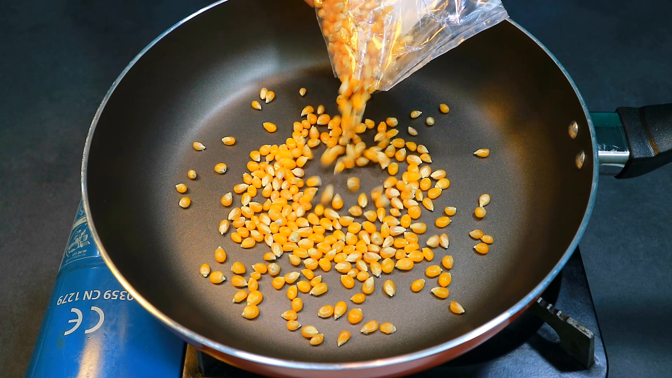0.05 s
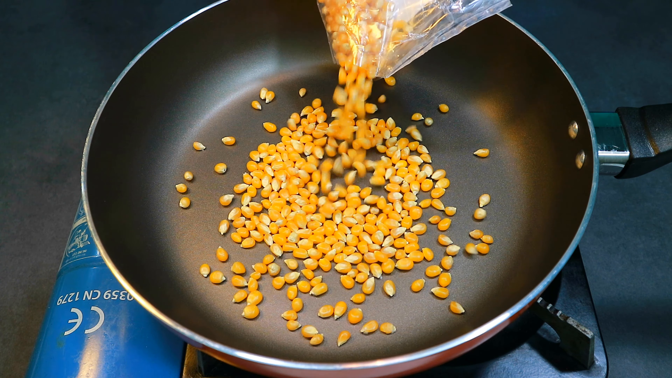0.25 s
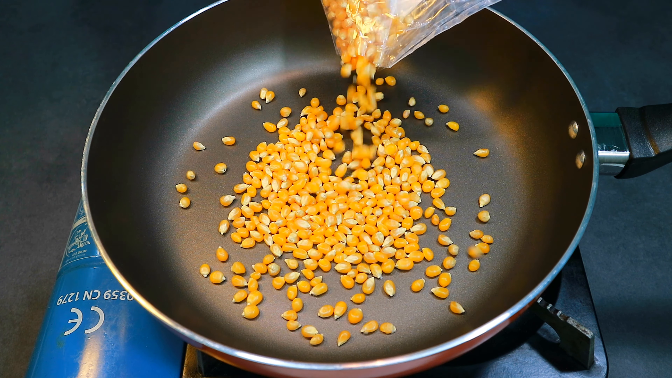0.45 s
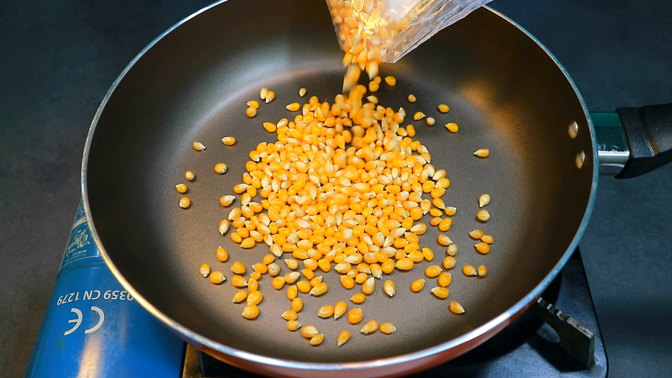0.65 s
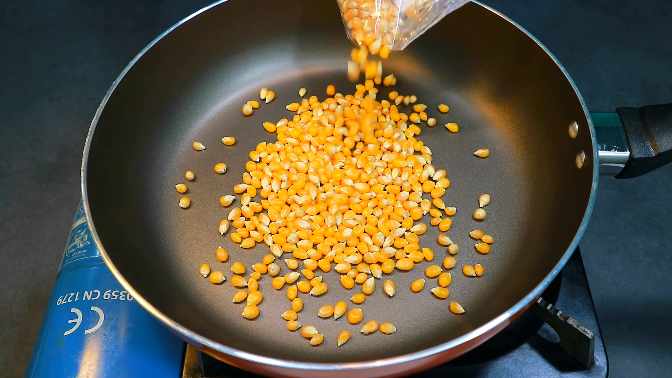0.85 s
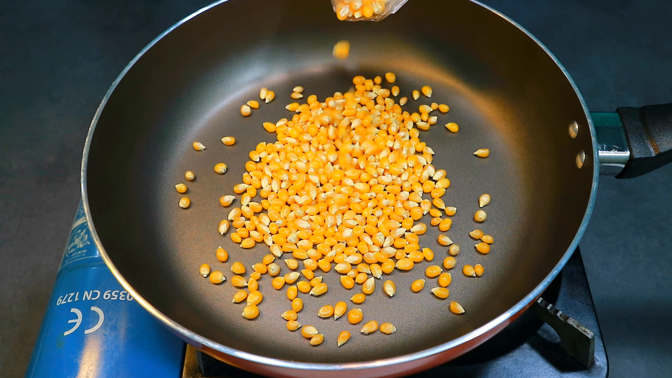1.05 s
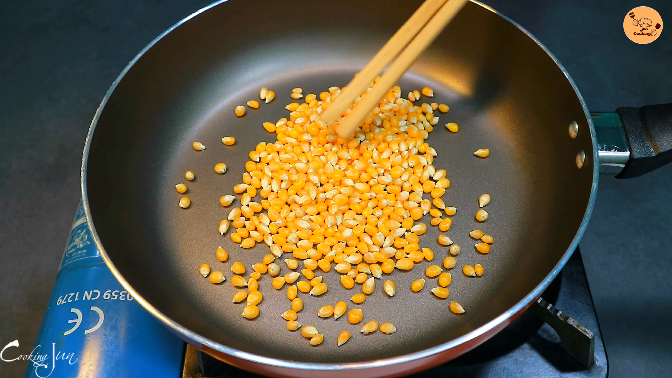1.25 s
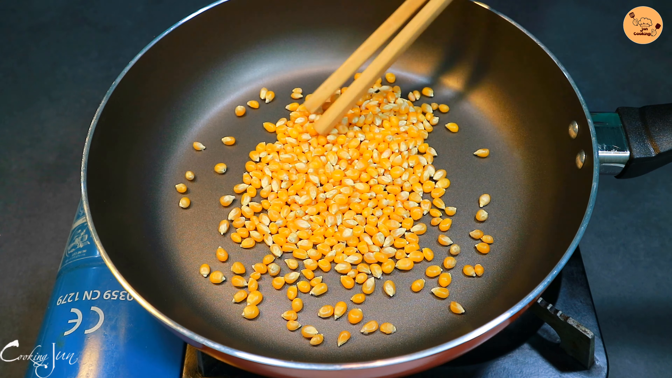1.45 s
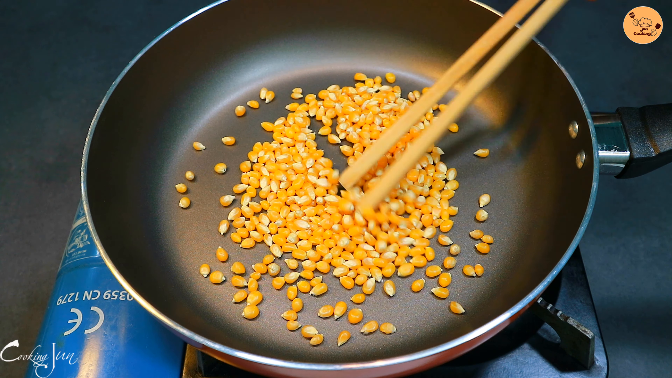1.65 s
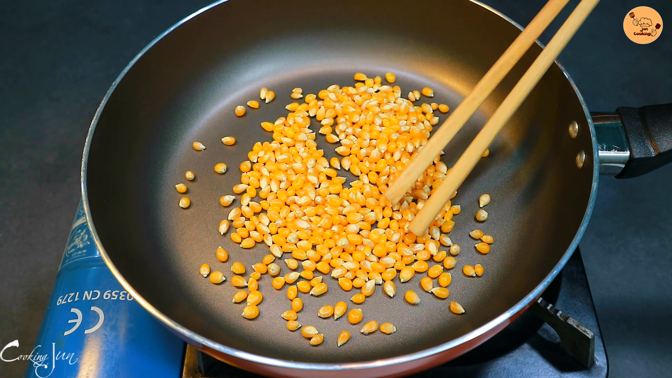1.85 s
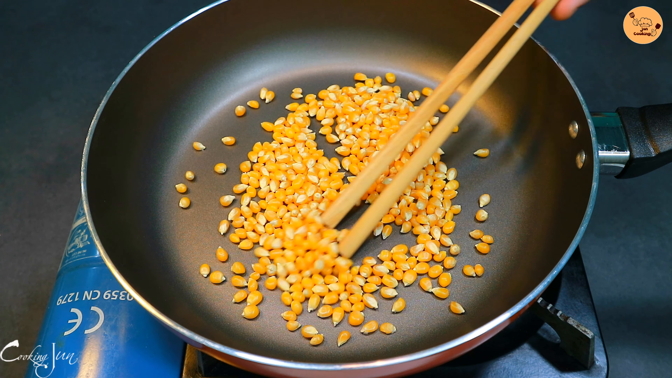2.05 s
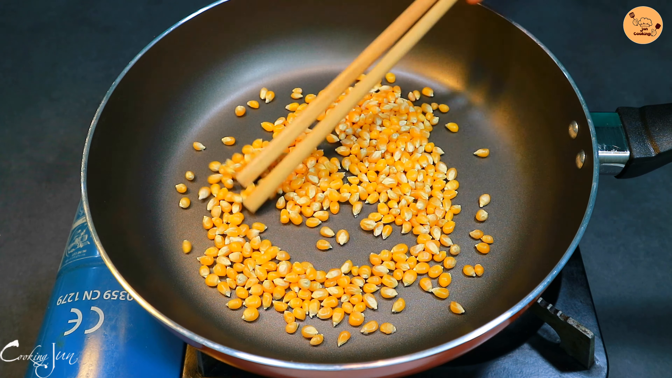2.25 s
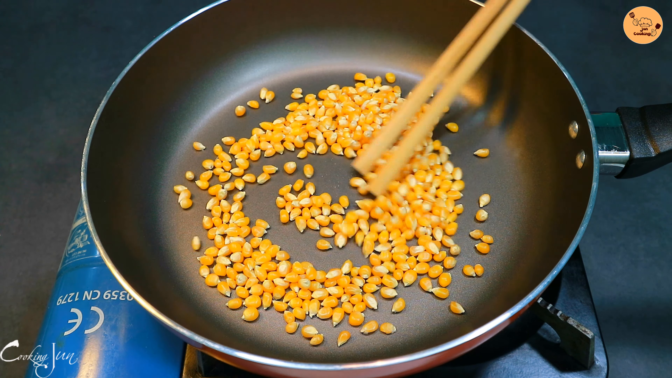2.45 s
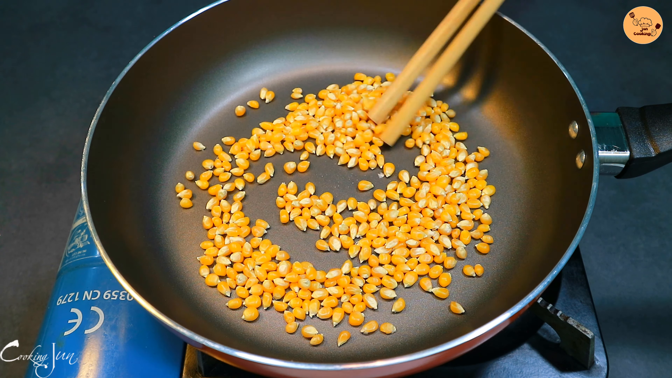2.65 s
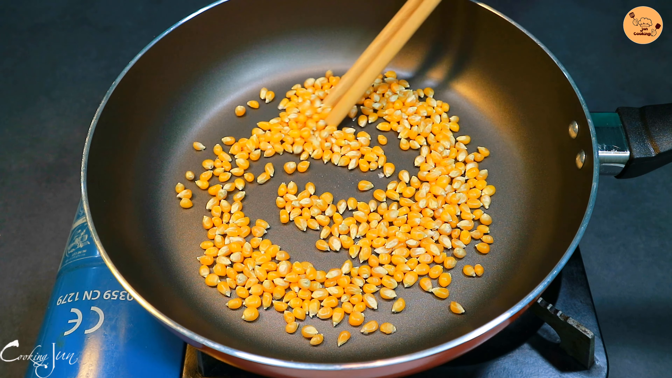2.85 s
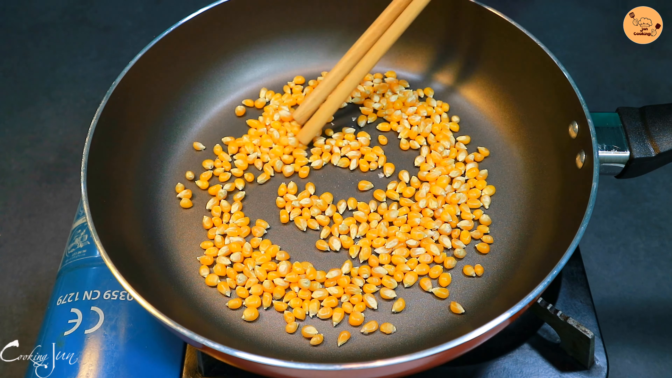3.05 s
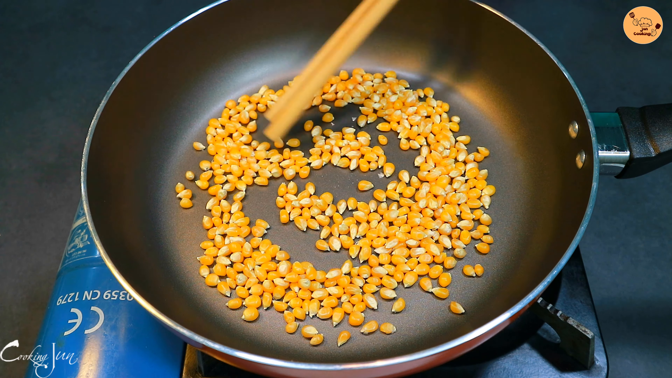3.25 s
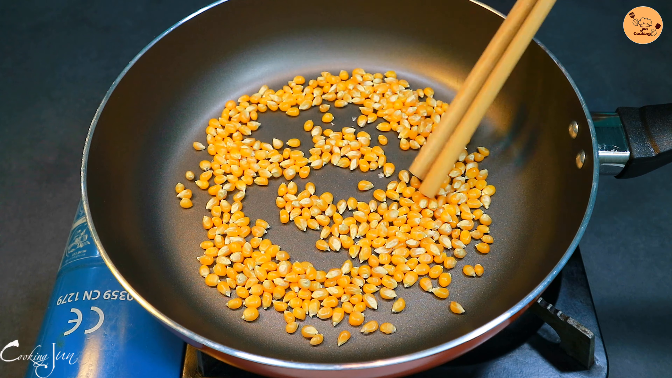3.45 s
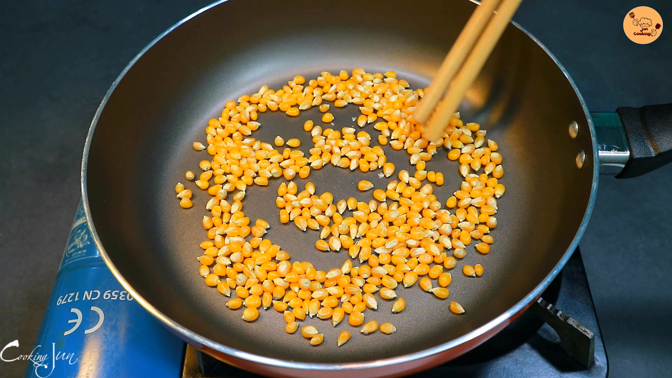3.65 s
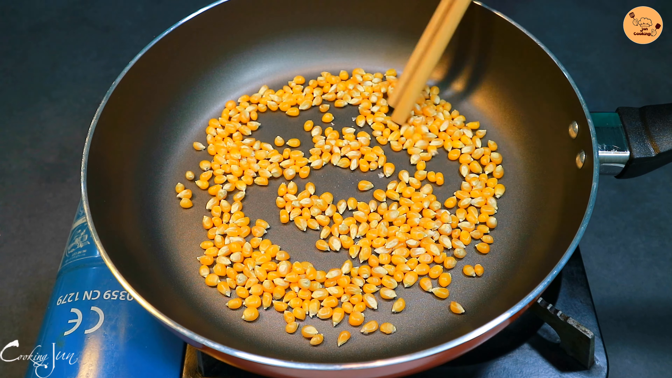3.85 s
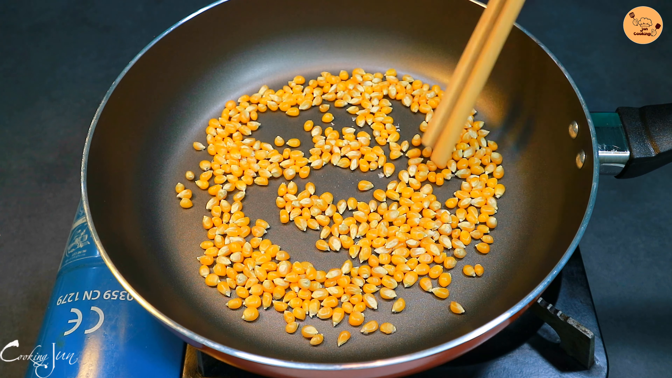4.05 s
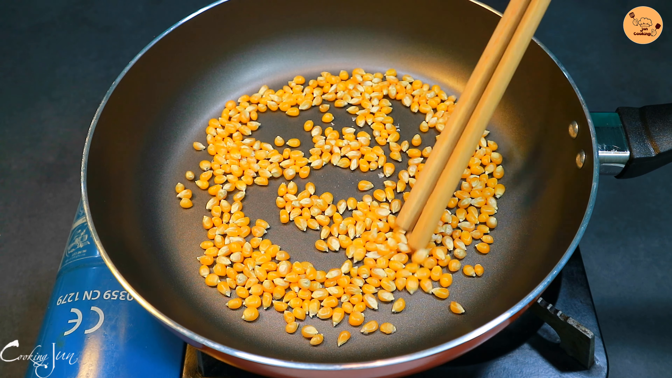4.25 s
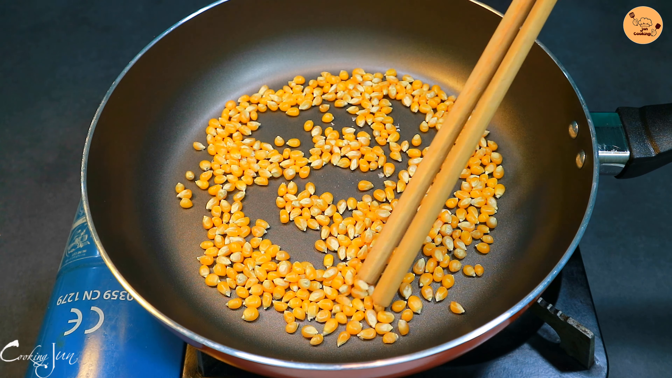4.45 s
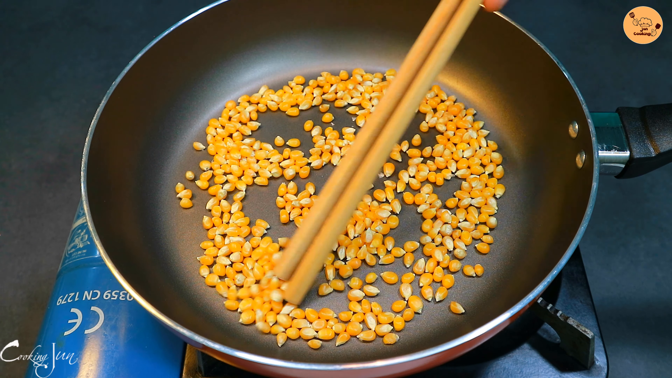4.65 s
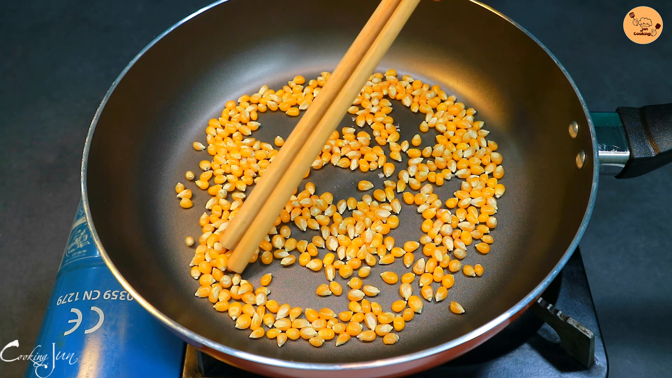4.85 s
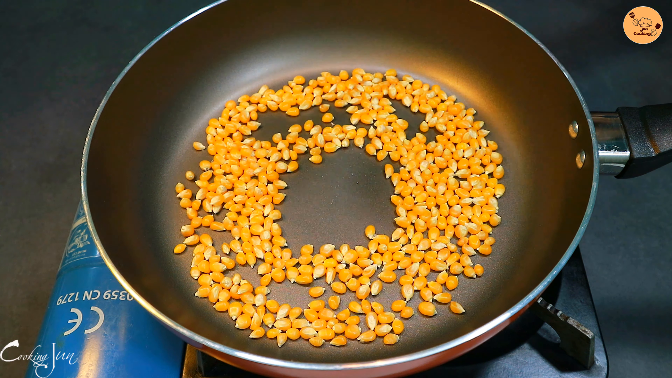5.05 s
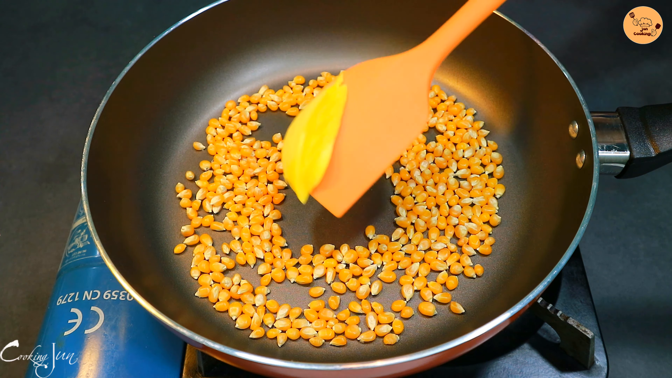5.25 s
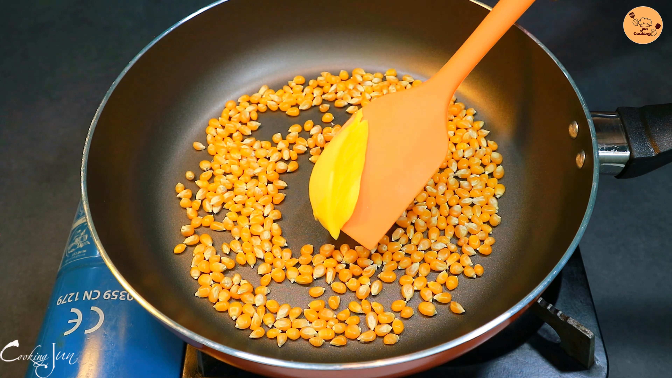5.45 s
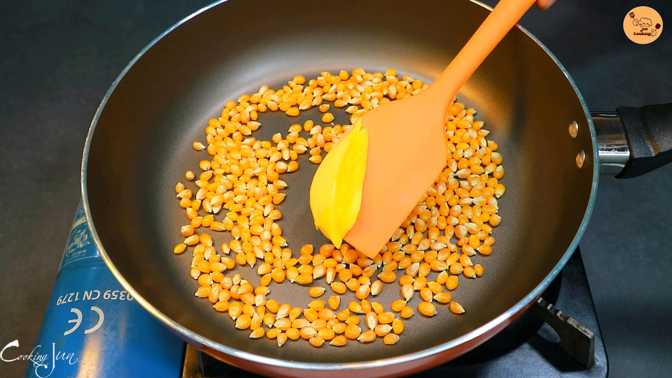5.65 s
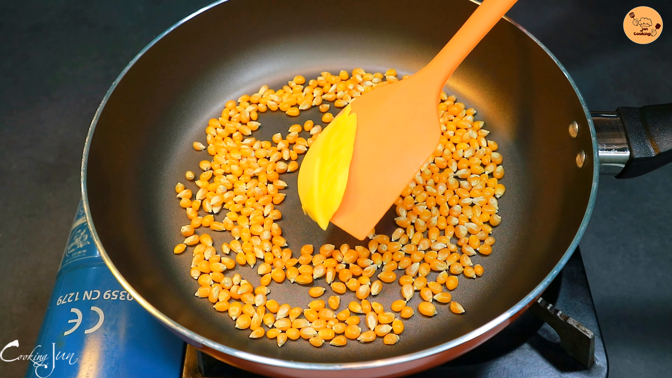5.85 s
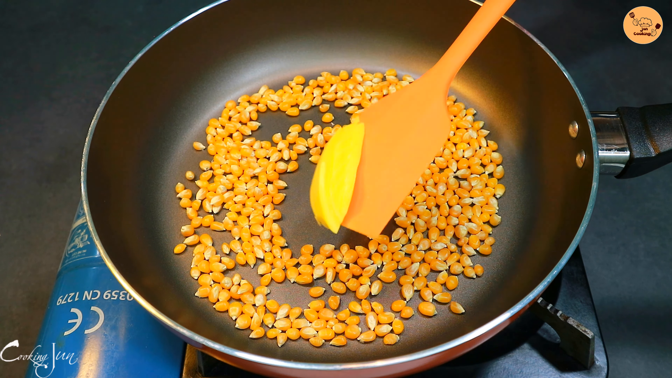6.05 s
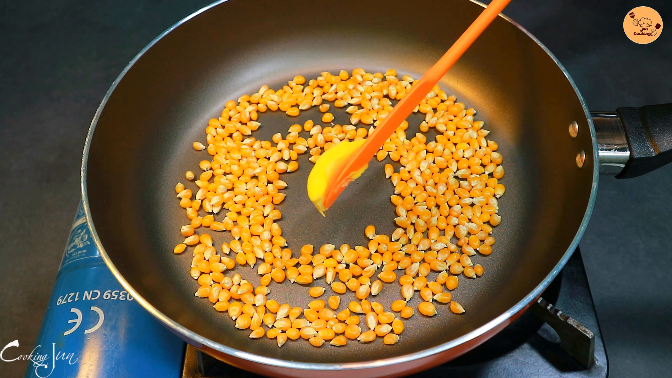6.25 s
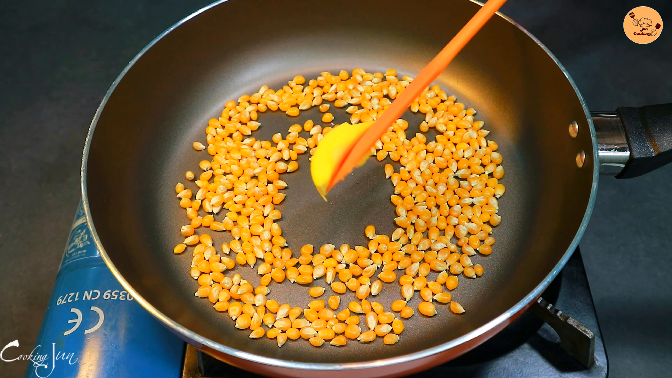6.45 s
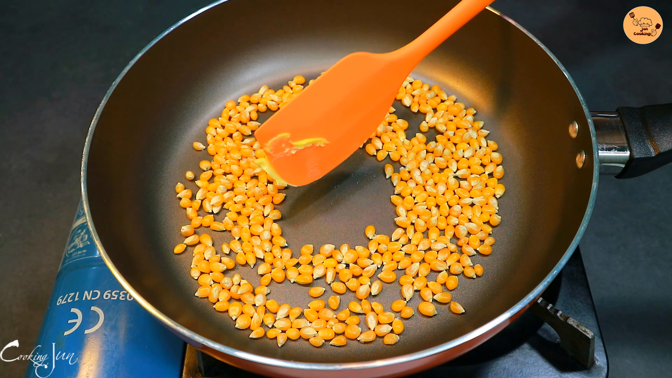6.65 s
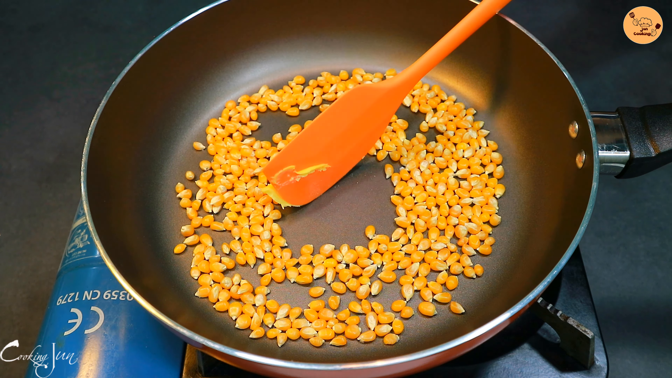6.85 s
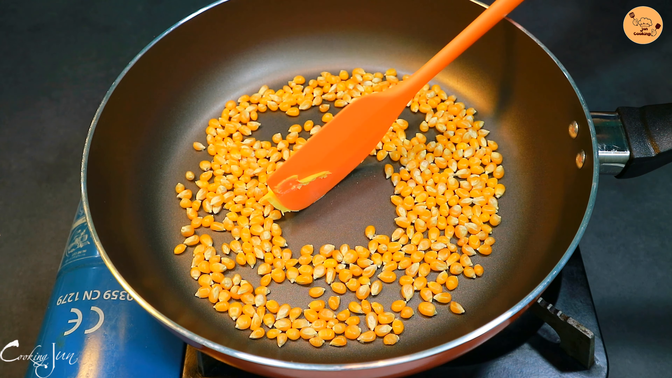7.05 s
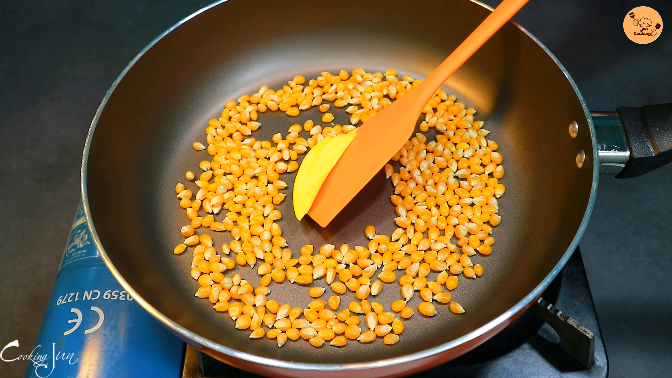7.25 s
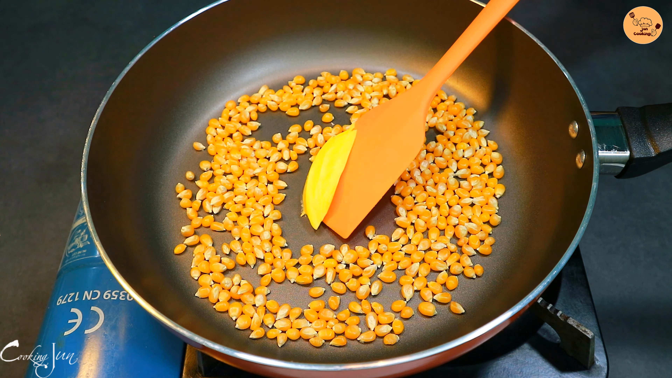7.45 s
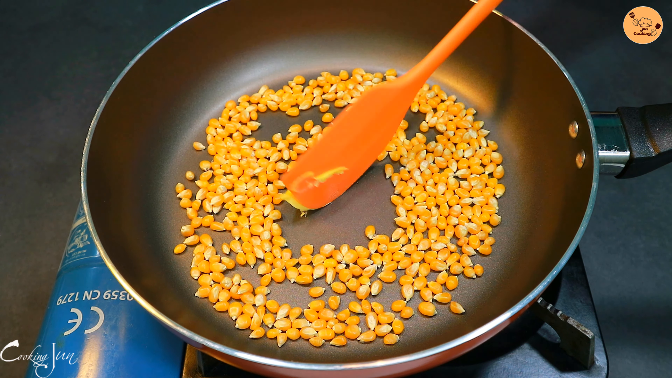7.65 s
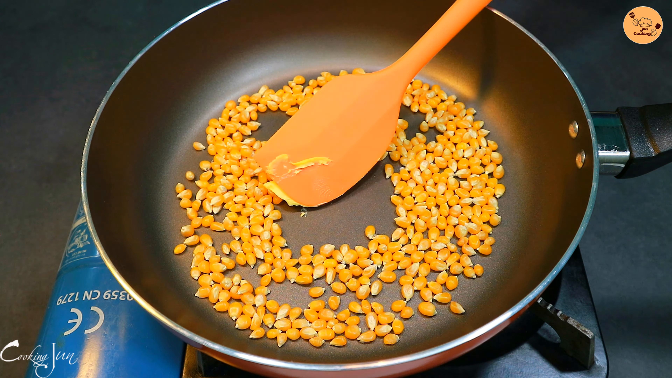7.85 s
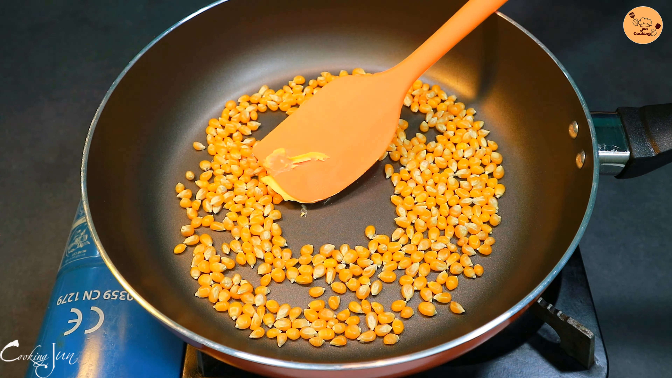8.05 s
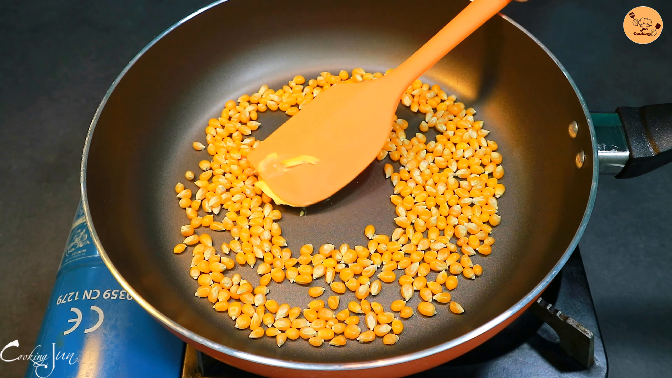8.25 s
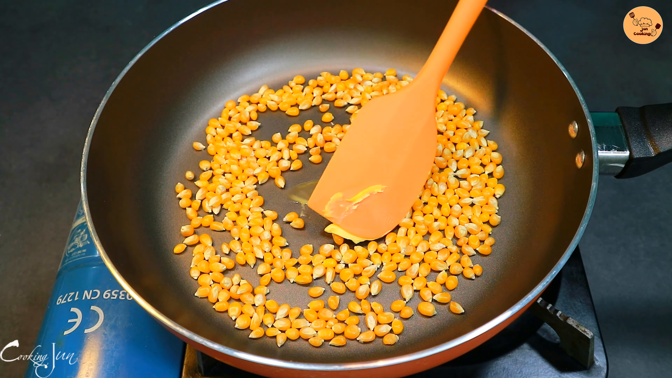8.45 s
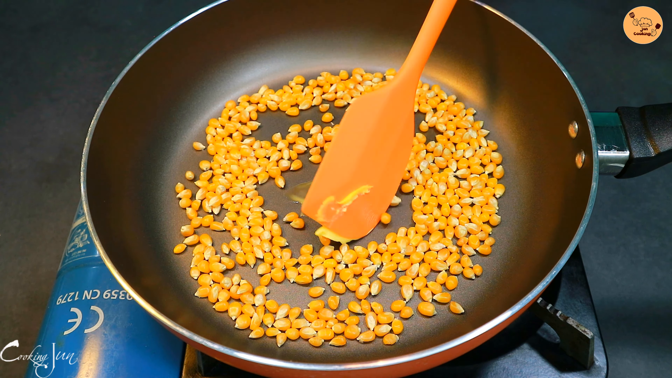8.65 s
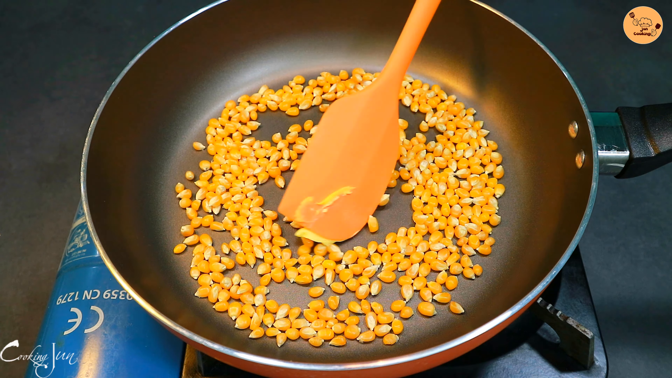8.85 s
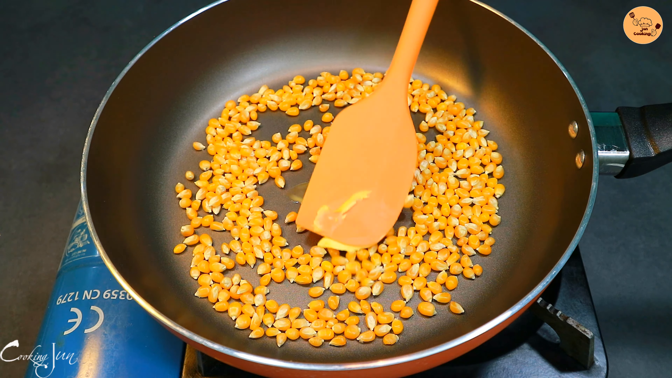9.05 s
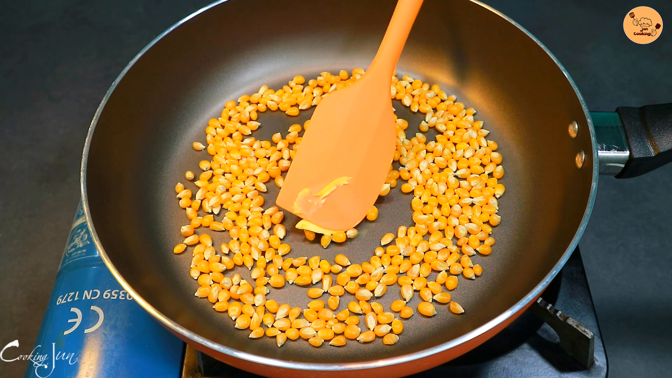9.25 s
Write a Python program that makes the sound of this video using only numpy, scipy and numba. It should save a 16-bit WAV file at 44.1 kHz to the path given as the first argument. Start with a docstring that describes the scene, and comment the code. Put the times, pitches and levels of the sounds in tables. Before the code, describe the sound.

Close by in a kitchen with a faint hum and hiss, hard corn kernels stream into a metal frying pan, each one ticking and ringing briefly. Chopsticks slide over the bottom and stir for several seconds, with wooden clacks and bursts of rattling. The rattle dies away, leaving scattered dull spatula taps that lightly shake the pan on its stand. Near the end the kernels click and roll again.

```python
"""Over a low hum and a wide hiss, dry corn kernels pour into a frying pan, each contact ringing its wall
and bottom. At 1.3 s chopstick tips slide over the bare bottom, then knock and stir the kernels until
about 5 s. From 5.6 s a spatula taps and bounces on the bottom; from 8.3 s it pushes the kernels about.
Every hit rings the same pan, and knocks and taps also shake it on its stand."""
import sys
import numpy as np
from scipy import signal
from scipy.fft import rfft, irfft
from scipy.io import wavfile
from scipy.ndimage import uniform_filter1d
from numba import njit

SR = 44100
rng = np.random.default_rng(int(sys.argv[2]) if len(sys.argv) > 2 else 0)


def write(x):
    x = np.atleast_2d(x).T
    wavfile.write(sys.argv[1], SR, np.round(np.clip(x, -1, 1) * 32767).astype(np.int16))


N = 410571


def undb(db):
    return 10 ** (np.asarray(db) / 20)


def unit_rms(x):
    return x / np.sqrt(np.mean(x ** 2))


def curves(rows):
    """Table columns at every sample."""
    time_s, *columns = np.transpose(rows)
    return [np.interp(np.arange(N) / SR, time_s, column) for column in columns]


def noise(spectrum, shape=N):
    """Unit-RMS noise shaped by (Hz, dB) points."""
    hz, db = np.transpose(spectrum)
    log_hz = np.log(np.arange(N // 2 + 1) * SR / N + 1)
    gain = undb(np.interp(log_hz, np.log(hz), db))
    return unit_rms(irfft(rfft(rng.standard_normal(shape)) * gain, N))


@njit
def damped_sines(start, end, pole, amplitude, rise, out):
    """One decaying sine per hit and mode, swelling during contact."""
    for hit in range(len(start)):
        for mode in range(pole.shape[1]):
            z, step, onset = amplitude[hit, mode] + 0j, pole[hit, mode], 1.
            life = int(-5. / np.log(abs(step)))
            for i in range(start[hit], min(end[hit], start[hit] + life)):
                out[i] += z.imag * (1 - onset)
                z *= step
                onset *= rise
    return out


# ringing breaks off: (time [s])
STOPS_S = [1.303, 5.118, 8.173]


def next_stop_s(time_s):
    ends_s = np.append(STOPS_S, N / SR)
    return ends_s[np.searchsorted(ends_s, time_s)]


def split_at_stops(x):
    return np.split(x, (np.array(STOPS_S) * SR).astype(int))


def ring(time_s, db, hz, scatter_hz, mode_db, t60_s, spot_db, contact_s):
    """Each hit lands on another spot: other mode strengths, pitches slightly off."""
    detune, spot = rng.standard_normal((len(time_s), 2, len(t60_s))).swapaxes(0, 1)
    pole = np.exp(2j * np.pi * (hz + scatter_hz * detune) / SR - np.log(1000) / (t60_s * SR))
    share = undb(mode_db + spot_db * spot)
    amplitude = undb(db[:, None]) * share / np.linalg.norm(share, axis=1, keepdims=True)
    start, end = (time_s * SR).astype(int), (next_stop_s(time_s) * SR).astype(int)
    return damped_sines(start, end, pole, amplitude, np.exp(-1 / (contact_s * SR)), np.zeros(N))


def burst(time_s, db, decay_s, spectrum):
    """The contact itself: a short burst of noise."""
    impulses = np.zeros(N)
    np.add.at(impulses, (time_s * SR).astype(int), undb(db) ** 2)
    pulses = uniform_filter1d(impulses, size=16) * 16
    decay = np.exp(-2 / (decay_s * SR))
    power = np.concatenate([signal.lfilter([1], [1, -decay], part) for part in split_at_stops(pulses)])
    return np.sqrt(np.abs(power)) * noise(spectrum)


# first bottom mode, lowered by kernels heaped on the centre: (time [s], pitch [Hz], scatter [Hz])
BOTTOM_FIRST_MODE = [(0, 707, 21.3), (.5, 660, 29), (1.3, 642, 28), (2.2, 659.6, 25.6), (3.1, 663.3, 16),
                     (5.099, 664.6, 23), (5.5, 690, 5.8), (8.2, 687, 7), (9.31, 672.6, 16)]
# upper bottom modes: (pitch [Hz])
BOTTOM_UPPER_HZ = [745, 822, 994, 1074, 1217, 1400, 1665, 1850]
# all bottom modes, first to last: (level [dB], t60 [s])
BOTTOM_MODES = [(9, 0.13), (10.5, 0.092), (10.5, 0.045), (10.5, 0.041), (4, 0.027), (-4.5, 0.19),
                (-6.5, 0.12), (-6.5, 0.12), (-4.5, 0.066)]


def pan_bottom(time_s, db, upper_db, spot_db, contact_s):
    """Bottom modes; off centre the upper ones gain on the first."""
    at_s, first_hz, first_scatter_hz = np.transpose(BOTTOM_FIRST_MODE)
    upper_hz = np.tile(BOTTOM_UPPER_HZ, (len(time_s), 1))
    hz = np.column_stack([np.interp(time_s, at_s, first_hz), upper_hz])
    scatter_hz = np.column_stack([np.interp(time_s, at_s, first_scatter_hz), 0.011 * upper_hz])
    mode_db, t60_s = np.transpose(BOTTOM_MODES)
    mode_db = mode_db + np.outer(upper_db, np.arange(len(BOTTOM_MODES)) > 0)
    return ring(time_s, db, hz, scatter_hz, mode_db, t60_s, spot_db, contact_s)


# wall modes: (pitch [Hz])
WALL_MODE_HZ = [3500, 4200, 4550, 5050, 5730, 6340, 6750, 7210, 7600, 8160, 8500, 9170, 9810, 10150, 11050,
                11900, 12630, 13400, 14200, 14900, 15450]
# wall modes: (scatter [Hz], level in pour [dB], level when pushed [dB], t60 before damping [s])
WALL_MODES = [(264, -51, -26, 0.048), (110, -3.5, -13.5, 0.029), (86, -8.5, -7, 0.018),
              (144.2, -23, -10, 0.021), (106, 4.5, -0.5, 0.024), (135, -2.5, 7, 0.019),
              (122, -24, 0.5, 0.019), (90, 7, 4.5, 0.02), (100, 0.5, -4.5, 0.03), (67, -3, -5, 0.041),
              (100, -20, -0.5, 0.013), (90, -2.5, -6.5, 0.03), (58, -1.5, -6, 0.043),
              (120, -6, -10.5, 0.039), (121, 4.5, 3, 0.02), (250, -8, -13, 0.029), (110, 4, -3.5, 0.025),
              (250, -31, -9.5, 0.04), (118.5, 8, -15, 0.01), (205, 0, -6, 0.021), (129, 0, -9.5, 0.027)]
# hard contact noise: (frequency [Hz], density [dB])
CRACK_SPECTRUM = [(900, -15), (1400, -1), (2000, -2), (2600, -1.5), (3400, -1.5), (6000, 6.5), (16000, -31)]
POUR_END_S = 1.303


def kernel_hits(time_s, wall_db, bottom_db, top_db, crack_db, spot_db, damping):
    """Kernels ring wall and bottom; harder contact tilts the ring to the top modes."""
    hz = np.array(WALL_MODE_HZ)
    scatter_hz, poured_db, pushed_db, t60_s = np.transpose(WALL_MODES)
    tilt_db = 0.27 * (top_db[:, None] + 10.5) * np.log2(hz / 7000)
    mode_db = np.where(time_s[:, None] < POUR_END_S, poured_db, pushed_db) + tilt_db
    # the busy region wanders over the pan and favours other modes
    region_db = 1.7 * rng.standard_normal((int(N / SR * 8) + 2, len(hz)))
    mode_db += region_db[(time_s * 8).astype(int)]
    wall = ring(time_s, wall_db, hz, scatter_hz, mode_db, t60_s / damping, spot_db, contact_s=0.00058)
    bottom = pan_bottom(time_s, bottom_db, upper_db=-4, spot_db=spot_db, contact_s=0.0016)
    return wall + bottom + burst(time_s, crack_db, decay_s=0.0013, spectrum=CRACK_SPECTRUM)


# stream from the bag, thinning out: (time [s], level [dB], bottom offset [dB])
KERNEL_POUR = [(0, -13, -19.5), (.06, -19, -20.5), (.98, -24.5, -27), (1.07, -36.5, -16), (1.13, -28, -24),
               (1.25, -39.5, -16), (1.303, -54.5, -13)]
# pushes that set kernels rolling:
# (start [s], rise [s], hold [s], fall [s], level [dB], bottom offset [dB], top emphasis [dB])
KERNEL_PUSHES = [(1.488, 0.024, 0.015, 0.17, -21, -16, -24), (1.587, 0.047, 0.13, 0.15, -16.5, -23, -18),
                 (1.846, 0.0071, 0.024, 0.072, -29, -20, -18), (1.889, 0.021, .02, .04, -28.5, -10, -29),
                 (1.974, .11, 0.28, 0.14, -18, -16, -30), (2.377, 0.075, 0.048, 0.62, -12.5, -20.5, -24),
                 (2.762, 0.11, 0.056, 0.28, -21, -16.5, -16), (3.104, 0.092, 0.093, 0.1, -24.5, -17.5, -14),
                 (3.398, 0.0098, 0.0041, 0.011, -39.5, -11, -31), (3.512, 0.033, 0.016, 0.16, -29, -5, -16),
                 (3.575, 0.036, .11, 0.078, -18.5, -20.5, -23), (3.817, 0.014, 0.15, 0.09, -18, -21.5, -27),
                 (4.041, 0.013, 0.013, 0.092, -26, -14, -22), (4.196, 0.0068, 0.0038, 0.091, -21, -10, -16),
                 (4.24, 0.019, 0.029, 0.062, -19, -16, -26), (4.28, 0.06, 0.17, 0.16, -22.5, -15, -20),
                 (4.579, 0.024, 0.18, 0.067, -20, -17.5, -15), (4.829, 0.0099, 0.17, 0.29, -25.5, -16, -20),
                 (5.141, .05, .12, .15, -63, 1, -18), (8.259, .015, 0.014, 0.057, -36, -5.5, -38.5),
                 (8.332, 0.068, .003, 0.025, -32.5, -4.5, -29), (8.429, 0.011, 0.032, 0.075, -23, -14, -32),
                 (8.56, 0.027, .005, 0.033, -37, -3, -21), (8.614, 0.032, 0.0044, 0.022, -32, -4.5, -43),
                 (8.681, 0.052, 0.0047, 0.032, -41, -0.5, -19.5),
                 (8.884, 0.017, 0.11, 0.064, -43.5, -3.5, -24), (9.066, .1, 0.06, 0.085, -22.5, -12, -21),
                 (9.266, 0.0056, .05, .05, -27, -11, -18.5)]
PUSH_RISE_DB, PUSH_FALL_DB = 9.5, 30


def kernel_motion(time_s):
    """Level, bottom offset and top emphasis: the pour, then pushes adding in power."""
    at_s, pour_db, pour_bottom_db = np.transpose(KERNEL_POUR)
    poured = [np.interp(time_s, at_s, pour_db), np.interp(time_s, at_s, pour_bottom_db),
              np.full(len(time_s), -17)]
    start_s, rise_s, hold_s, fall_s, db, bottom_db, top_db = np.transpose(KERNEL_PUSHES)[:, :, None]
    age_s = time_s - start_s
    db = db - PUSH_RISE_DB * np.clip(1 - age_s / rise_s, 0, 1)
    db -= PUSH_FALL_DB * np.maximum(age_s - rise_s - hold_s, 0) / fall_s
    power = undb(db) ** 2 * (age_s >= 0) * (time_s < next_stop_s(start_s)) + 1e-20
    total = power.sum(axis=0)
    bottom_share = (power * undb(bottom_db) ** 2).sum(axis=0) / total
    pushed = [10 * np.log10(total), 10 * np.log10(bottom_share), (power * top_db).sum(axis=0) / total]
    return np.where(time_s < POUR_END_S, poured, pushed)


def kernel_rattle(count=14000, bunch_rate_hz=90, busy_db=-23):
    """Dense kernel contacts in bunches, few strong and many weak."""
    time_s = np.sort(rng.random(count)) * (N - 1) / SR
    strength = np.minimum(rng.exponential(size=count), 3.5)
    hit_db = np.where(time_s < POUR_END_S, 4.5 * strength - 3, 3 * strength)  # falling kernels vary more
    bunch_db = 0.52 * rng.standard_normal(int(N / SR * bunch_rate_hz) + 1)
    hit_db += bunch_db[(time_s * bunch_rate_hz).astype(int)]
    db, bottom_db, top_db = kernel_motion(time_s)
    audible = db > -80
    time_s, hit_db, db, bottom_db, top_db = np.array([time_s, hit_db, db, bottom_db, top_db])[:, audible]
    crack_db = -24.5 - 0.27 * (db - busy_db)  # gentler rattle: more crack, less ring
    db += hit_db
    return kernel_hits(time_s, db - 4, db + bottom_db - 7.5, top_db, db + crack_db,
                       spot_db=8.5, damping=1.196)


# low background: (time [s], hum [dB], rumble [dB])
HUM_LEVELS = [(0.0, -85, -72), (1.28, -84, -76), (1.33, -64, -57.5), (1.9, -71, -65.5), (2.5, -69, -58),
              (3.2, -67.5, -64), (4.1, -63, -55), (5.5, -62, -63), (9.31, -61, -59.5)]
# rumble: (frequency [Hz], density [dB])
RUMBLE_SPECTRUM = [(15, -50), (25, -8), (44, -14), (70, -1.5), (113, -6), (145, -1.5), (291, -2),
                   (560, -7.5), (617, -30.5), (700, -7), (910, -44), (1540, -120)]
# hiss: (time [s], centre [dB], sides [dB])
HISS_LEVELS = [(0, -59, -99), (1.4, -58.5, -75), (3.2, -66, -89), (3.47, -55.5, -66), (4.17, -58.5, -80),
               (5.0, -50, -75), (5.3, -55, -54), (9.31, -54.5, -60)]
# hiss: (frequency [Hz], density [dB])
HISS_SPECTRUM = [(180, -26), (300, 0), (337, -5.5), (656, 0.5), (2610, -8), (13100, -12), (15000, -9.5),
                 (16000, -17)]


def kitchen_background(hum_hz=70.6, waver_hz=0.58, flutter_db=1.1):
    """Wavering hum, near-centred rumble and wide hiss."""
    hum_db, rumble_db = curves(HUM_LEVELS)
    waver = unit_rms(uniform_filter1d(rng.standard_normal(N), SR // 4))
    phase = 2 * np.pi * np.cumsum(hum_hz + waver_hz * waver) / SR
    hum = np.sqrt(2) * sum(undb(db) * np.sin(k * phase) for k, db in enumerate([-1.5, -9, -10.5], 1))
    antiphase = np.array([[1], [-1]])
    highpass = signal.butter(2, 140, "high", fs=SR, output="sos")  # deep bass has no direction
    rumble = noise(RUMBLE_SPECTRUM) + 0.38 * antiphase * signal.sosfilt(highpass, noise(RUMBLE_SPECTRUM))
    hiss_centre, hiss_sides = undb(curves(HISS_LEVELS)) * noise(HISS_SPECTRUM, (2, N))
    flutter = unit_rms(uniform_filter1d(rng.standard_normal(N), SR // 12))
    hum *= undb(hum_db + flutter_db * flutter)
    return hum + undb(rumble_db) * rumble + hiss_centre + antiphase * hiss_sides


# single hard contacts: (time [s], level [dB], top emphasis [dB], crack offset [dB])
HARD_TICKS = [(0.0282, 1, -12, -25), (0.0714, 2, -9, -25), (0.0958, -2, -15, -19), (0.1221, -2, -21, -24),
              (0.159, -3, -29, -25), (0.1873, -1.5, -20, -20), (0.2164, -7, -25, -21),
              (0.2418, -8, -13, -24), (0.294, -2, -13, -32), (0.3454, -1.5, -6, -24), (0.374, -6, -15, -20),
              (0.3934, -3, -11, -28), (0.445, -3.5, -17, -20), (0.4638, -1.5, -21, -20),
              (0.5043, 0, -13, -21.5), (0.5495, -7, -17, -24), (0.5706, -14, -12, -26),
              (0.605, -0.5, -20, -19), (0.6294, -7, -15, -27), (0.6665, -4, -15, -23),
              (0.6904, -10, -16.5, -24), (0.7831, -6, -14, -21), (0.8044, -9, -19, -16),
              (0.8463, -5, -4.5, -21), (0.8747, -3, -11, -26), (0.8925, -1, -8, -22),
              (0.9492, -3.5, -13, -21), (0.9604, -3, -11, -24), (0.9837, -9, -12, -29),
              (1.0816, -10, -10, -19), (1.0913, -5.5, -2, -11.5), (1.1191, -2, -5, -19),
              (1.1344, -10, -15, -28), (1.1568, -11, -12, -28), (1.1945, -7, -24, -19.5),
              (1.2196, -13, -17, -23), (1.272, -3, -6, -13), (1.4975, 0, -15, -16.5), (1.5055, 0, -8, -17),
              (1.5406, -6, -20, -21), (1.611, -13, -24, -17), (1.6312, 0, -29, -26), (1.652, 5, -24, -28),
              (1.711, 2, -9, -36), (1.7533, 3, -15, -37), (1.7904, -4, -7, -37), (1.8517, -6.5, -14, -34),
              (1.9096, -7.5, -24, -21), (1.9405, -14, -20, -29), (1.9667, -16, -20, -22),
              (2.0093, -13, -28, -19), (2.0448, -12, -13, -16), (2.1415, -14, -17, -24),
              (2.1855, -3.5, -2, -18), (2.222, -2, -22, -20), (2.2534, -4, -19, -17), (2.2807, 1, -36, -23),
              (2.3738, -2, -22, -27), (2.394, -1, -19, -21), (2.4364, -6, -16, -17), (2.624, 1.5, -16, -34),
              (2.6445, -1.5, -20, -18), (2.7945, -6.5, -15, -15), (2.9386, 0, -22, -28),
              (2.9597, -3, 2, -22), (3.0056, -10, -3, -27), (3.0338, -6.5, 10, -28),
              (3.0504, -9.5, -5, -27), (3.1273, -9.5, -4, -20), (3.2186, -2, -8, -24),
              (3.2434, -11, -19, -25), (3.2596, -10, -16, -32), (3.291, -1.5, -18, -41),
              (3.3208, -4, -12, -44), (3.4092, -33, -15, -26), (3.5113, -13.5, -31, -21),
              (3.5264, -8.5, -13, -23), (3.5468, -5, -15, -25), (3.5775, -13, -11, -16),
              (3.5986, -0.5, 8, -17.5), (3.6144, -6, -10, -14), (3.6443, -0.5, -15, -22),
              (3.6634, -2.5, -18, -17.5), (3.6865, -16, -14, -25), (3.8227, -13, -12, -13),
              (3.8342, -4, -8, -34), (3.8724, -3.5, -16, -30), (3.9586, -3, -19, -24),
              (4.0613, -2, -21, -38), (4.14, -21, -27, -17), (4.2013, -12, -9, -22), (4.2133, -1, -16, -28),
              (4.2333, -12, -17, -20), (4.2468, 2, -24, -25), (4.2755, 3.5, -26, -32),
              (4.3335, -22, -15, -24), (4.4179, -2, -3, -28), (4.4604, -1, -25, -24),
              (4.6025, -4, -14, -26), (4.6202, 4.5, -10, -26), (4.6663, -5, -15, -30), (4.686, 0, -12, -33),
              (4.7757, 1, 12, -32), (4.8383, -10, -13, -22), (4.8593, -0.5, -2, -23),
              (4.9022, -3.5, -8, -29), (4.9662, -2, 4, -24), (4.994, -7, -15, -25),
              (5.0619, -10.5, -16, -18), (5.7123, -21, -49, -7.5), (5.7902, -41, -26, -3),
              (7.0382, -26, -13, -17.5), (7.5924, -27.5, -32, -9.5), (8.027, -4.5, -48, -14.5),
              (8.295, -17, -21, -24), (8.344, -13.5, -16, -25), (8.3765, -3, -14, -30),
              (8.4254, -13, -6, -19), (8.4367, -2, -2, -29), (8.4794, -4.5, -12, -35),
              (8.5026, -13, -19, -18), (8.5934, -17, -21, -27), (8.6423, -11, -10, -33),
              (8.6921, -20.5, -22, -23), (8.7136, -33, -10, -22), (8.738, -11, -9, -27),
              (8.9431, -15.5, -1.5, -25), (8.9999, -11.5, -24, -30), (9.0735, -11, -1, -34),
              (9.098, -10, -19, -28), (9.1142, -7, -16, -24), (9.1701, -18, -14, -21),
              (9.2034, -2.5, -6, -25), (9.2722, 1.5, -22, -34), (9.2954, -8, -20, -31)]


def hard_ticks():
    """Hard hits on the bare pan that stand out, mostly kernels."""
    time_s, db, top_db, crack_db = np.transpose(HARD_TICKS)
    return kernel_hits(time_s, db + 0.51, db - 43.5, top_db, db + crack_db - 5.5,
                       spot_db=1.5, damping=2.15)


# tips sliding on the bare bottom: (time [s], level [dB])
SLIDE_LEVELS = [(1.3, -53), (1.314, -41.5), (1.338, -40), (1.36, -41), (1.376, -38.5), (1.548, -44),
                (1.6, -50)]
# chopstick resonances: (frequency [Hz], density [dB])
SLIDE_SPECTRUM = [(150, -31), (250, -22), (348, -17), (519, -33), (576, -18), (674, -38), (1100, -3),
                  (1350, -27), (2280, -18.5), (2570, -39), (5540, -37), (5930, -40), (14200, -43),
                  (16000, -45)]


def chopstick_slide():
    """Friction noise in the sticks' resonances."""
    time_s = np.arange(N) / SR
    sliding = (time_s > SLIDE_LEVELS[0][0]) & (time_s < SLIDE_LEVELS[-1][0])
    return sliding * undb(curves(SLIDE_LEVELS)[0]) * noise(SLIDE_SPECTRUM)


# blunt contact noise: (frequency [Hz], density [dB])
BLUNT_SPECTRUM = [(520, -11), (680, 8), (1100, -5.5), (1900, -13.5), (2300, -25), (3200, -22.5),
                  (5000, -40)]


def blunt_hits(time_s, db, upper_db):
    """A blunt tool rings the bottom, with a dull burst of noise."""
    bottom = pan_bottom(time_s, db, upper_db + 7, spot_db=4.5, contact_s=0.00028)
    return bottom + burst(time_s, db - 25, decay_s=0.032, spectrum=BLUNT_SPECTRUM)


# tips on the bottom: (time [s], level [dB], clack offset [dB])
CHOPSTICK_KNOCKS = [(1.493, -16.5, -16), (1.627, -18, -0.5), (1.9, -28, -8), (2.174, -30, 10),
                    (2.208, -21, -10), (2.416, -10, -9.5), (2.492, -12.5, -20), (2.512, -22, -11),
                    (2.549, -12, -5), (2.784, -32.5, 12), (2.867, -19, -15), (3.101, -14, -15),
                    (3.134, -13, -11), (3.203, -20.5, 0.5), (3.51, -29, -10), (3.525, -23, -1),
                    (3.619, -9, 7), (3.833, -10, -3), (3.85, -5, -25), (3.871, -5.5, -9.5),
                    (3.934, -22, -16), (4.234, -2.5, -31), (4.265, -13, -13), (4.402, -29, -16),
                    (4.492, -14, -9), (4.621, -17, -11), (4.643, -16, -19), (4.74, -10, -19),
                    (4.797, -15.5, -20), (4.85, -13, -9), (4.971, -10.5, -5.5)]
# wood on metal: (frequency [Hz], density [dB])
CLACK_SPECTRUM = [(700, -4), (1400, -8), (2600, -7.5), (3600, -19.5), (6000, -12.5), (16000, -29)]


def chopstick_knocks():
    """Wooden tips knock on the bottom with a clack."""
    time_s, db, clack_db = np.transpose(CHOPSTICK_KNOCKS)
    knocks = blunt_hits(time_s, db - 12, upper_db=-11)
    return knocks + burst(time_s, db + clack_db - 15, decay_s=0.0046, spectrum=CLACK_SPECTRUM)


# pan on its stand: (pitch [Hz], scatter [Hz], level [dB], t60 [s])
STAND_MODES = [(154.3, 0.49, -5, 0.9), (241, 14, -3, 0.38), (336, 6.7, 3, 0.13), (480, 11, -1, 0.28)]


def stand_thumps(knocks, taps, medium_blow_db=-19.5, knock_db=-54.5, tap_db=-47.5):
    """Blows shake the pan on its stand; the thump grows more slowly than the blow."""
    time_s, blow_db, _ = np.vstack([knocks, taps]).T
    db = 0.62 * (blow_db - medium_blow_db) + np.repeat([knock_db, tap_db], [len(knocks), len(taps)])
    modes = ring(time_s, db, *np.transpose(STAND_MODES), spot_db=7.5, contact_s=0.013)
    thud_spectrum = [(150, -19), (280, -6), (520, 0.5), (640, -11), (900, -45)]
    return modes + burst(time_s, db - 11.5, decay_s=0.024, spectrum=thud_spectrum)


# spatula on the bottom: (time [s], level [dB], upper mode offset [dB])
SPATULA_TAPS = [(5.614, -18.5, -23), (5.632, -21, -28), (5.714, -5.5, -1.5), (5.791, -10, 3),
                (5.85, -16.5, -11), (5.891, -23.5, -8), (5.932, -21.5, -5), (5.965, -26, -5),
                (5.992, -29, 7), (6.017, -28.5, 0), (6.044, -34, -4), (6.073, -29, 5), (6.948, -35, -20),
                (7.04, -9.5, -12.5), (7.089, -11.5, -13), (7.114, -15, -3), (7.156, -23.5, -25),
                (7.272, -36, -28), (7.348, -30, -29), (7.593, -11.5, 5), (7.619, -27, -17),
                (7.736, -17.5, -6), (7.826, -21.5, -21), (7.944, -18.5, -17), (8.028, -1.5, 7),
                (8.054, -6.5, 18), (8.147, -10, -15), (8.262, -30, -4), (8.345, -14.5, -14.5),
                (8.451, -14, -25), (8.514, -18.5, -10)]


def spatula_taps():
    """The soft spatula edge favours the bottom modes."""
    time_s, db, upper_db = np.transpose(SPATULA_TAPS)
    taps = blunt_hits(time_s, db - 6, upper_db)
    return taps + burst(time_s, db - 46.5, decay_s=0.0049, spectrum=CRACK_SPECTRUM)


def room_echo(pan, t60_s=0.13, delay_s=0.003):
    """Short diffuse echo that breaks off with the ringing."""
    time_s = np.arange(SR // 4) / SR
    tail = rng.standard_normal(len(time_s)) * np.exp(-np.log(1000) * time_s / t60_s) * (time_s > delay_s)
    tail /= np.linalg.norm(tail)
    return np.concatenate([signal.fftconvolve(part, tail)[:len(part)] for part in split_at_stops(pan)])


def scene():
    # the pan radiates little below its first bottom mode
    highpass = signal.butter(8, 605, "high", fs=SR, output="sos")
    pan = signal.sosfilt(highpass, kernel_rattle() + hard_ticks() + chopstick_knocks() + spatula_taps())
    echo = undb(-10.5) * room_echo(pan)
    thumps = stand_thumps(CHOPSTICK_KNOCKS, SPATULA_TAPS)
    return pan + echo + thumps + chopstick_slide() + kitchen_background()


def record(dry):
    """Round the loudest peaks and cut the top."""
    lowpass = signal.ellip(10, 0.2, 70, 15700, fs=SR, output="sos")
    return signal.sosfilt(lowpass, np.tanh(0.78 * dry) / 0.86)


dry = scene()
out = record(dry)
write(out)
```